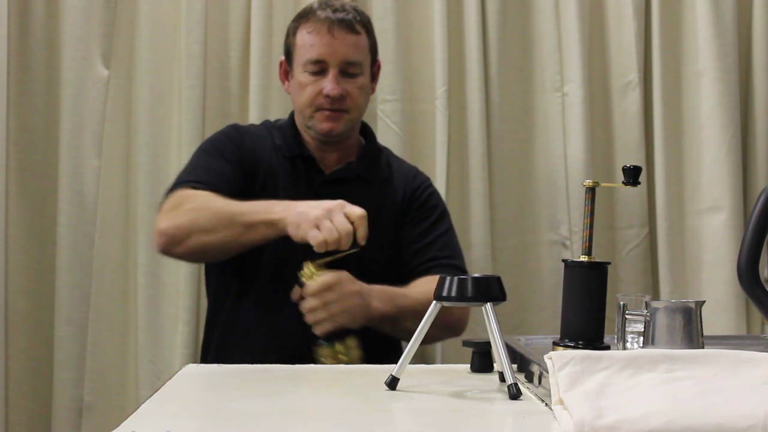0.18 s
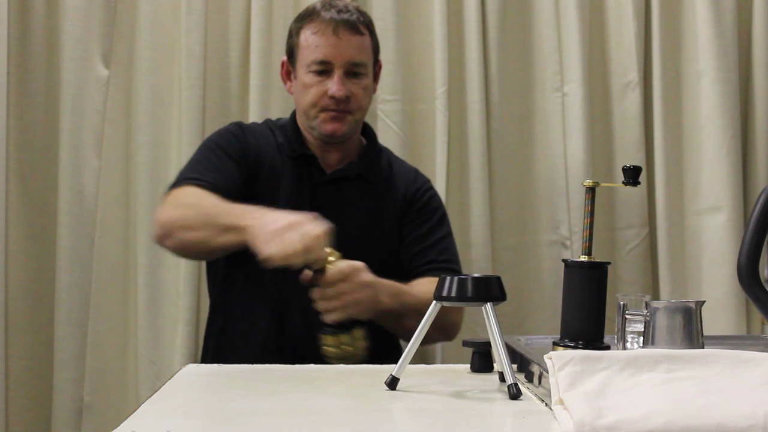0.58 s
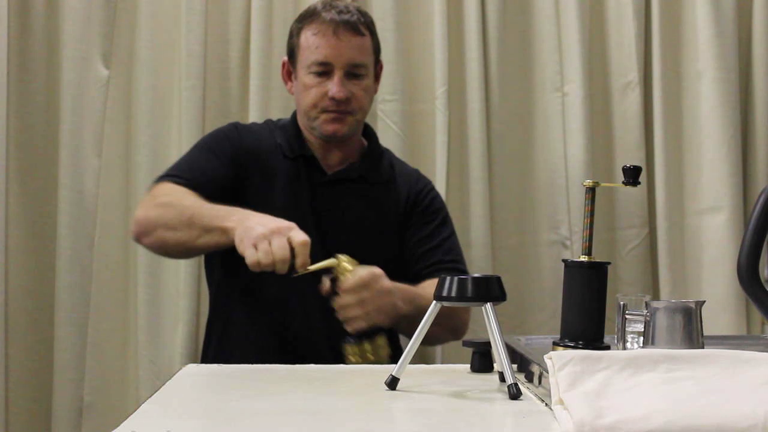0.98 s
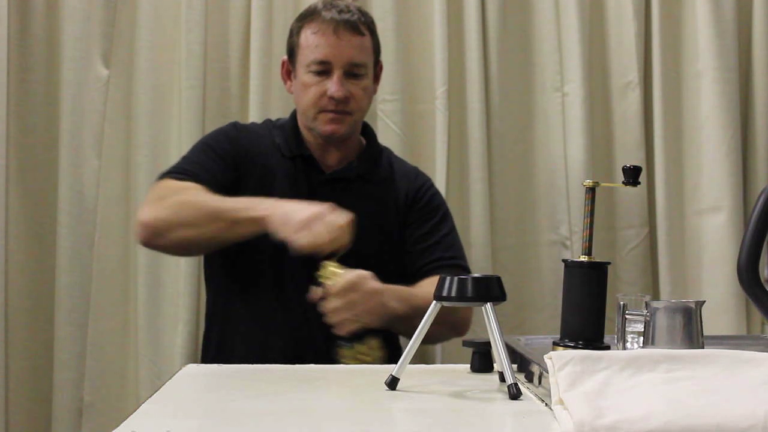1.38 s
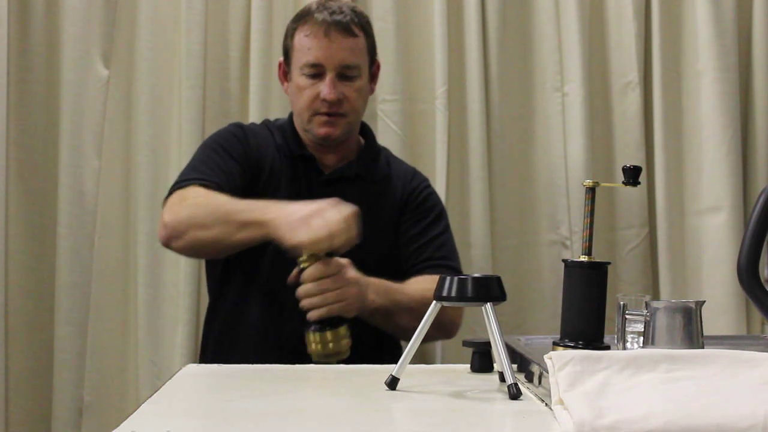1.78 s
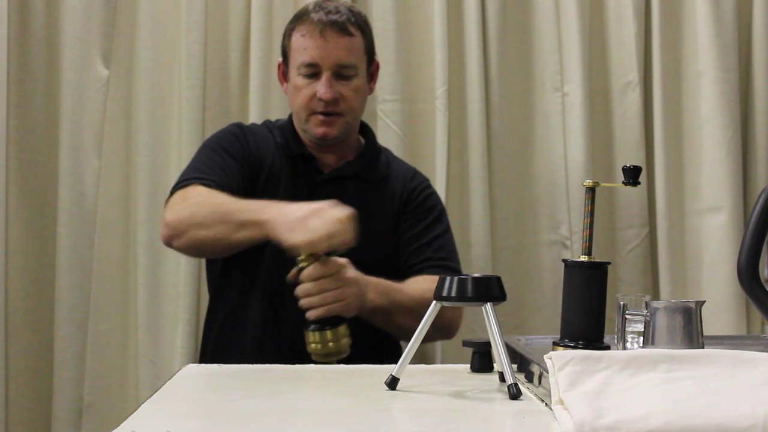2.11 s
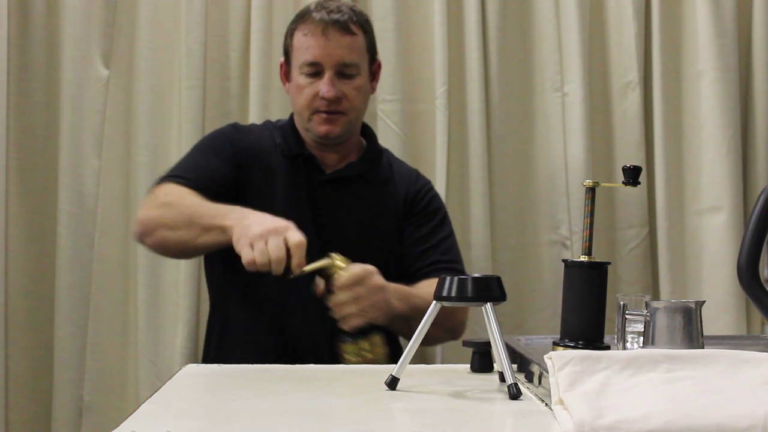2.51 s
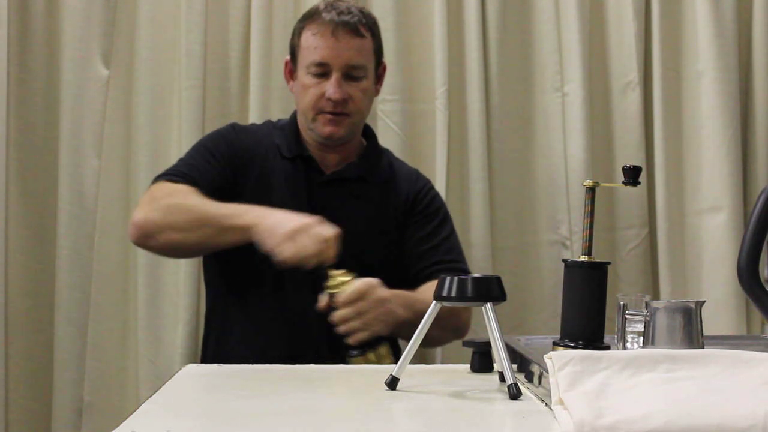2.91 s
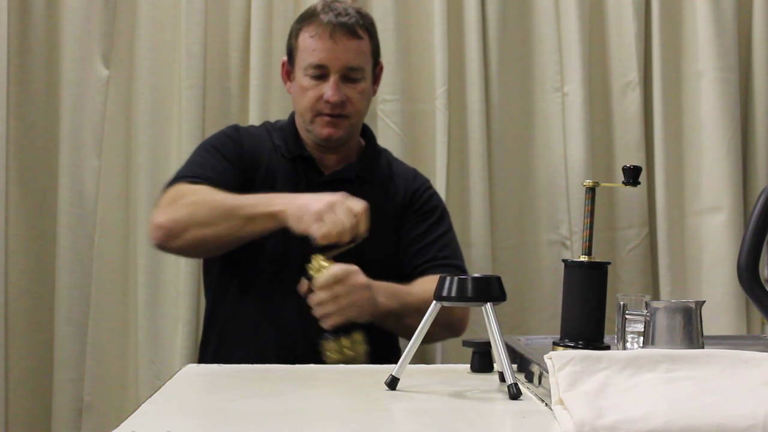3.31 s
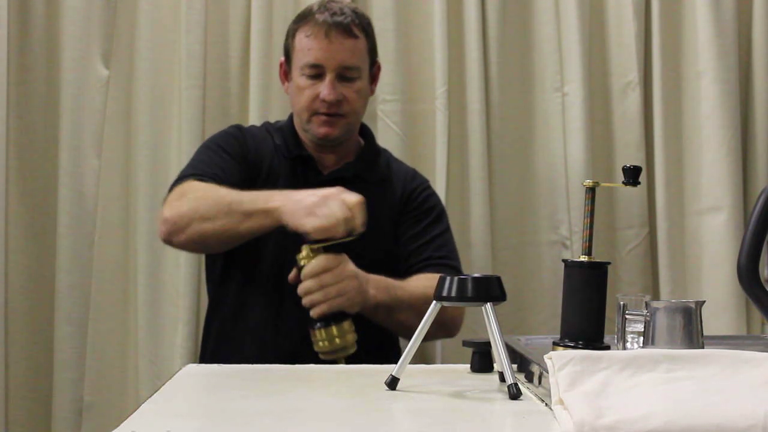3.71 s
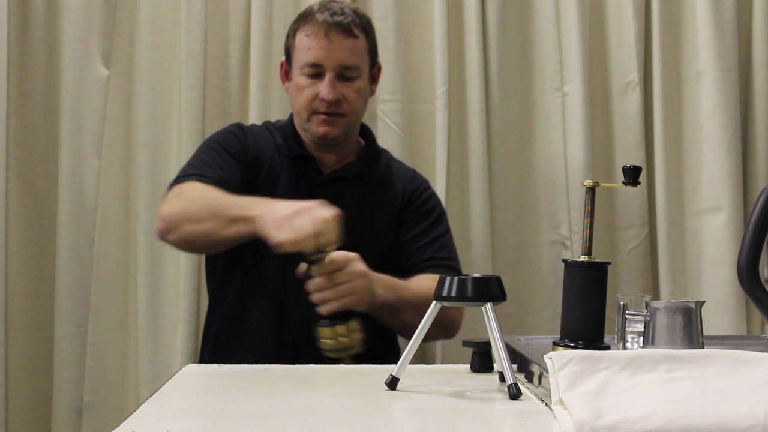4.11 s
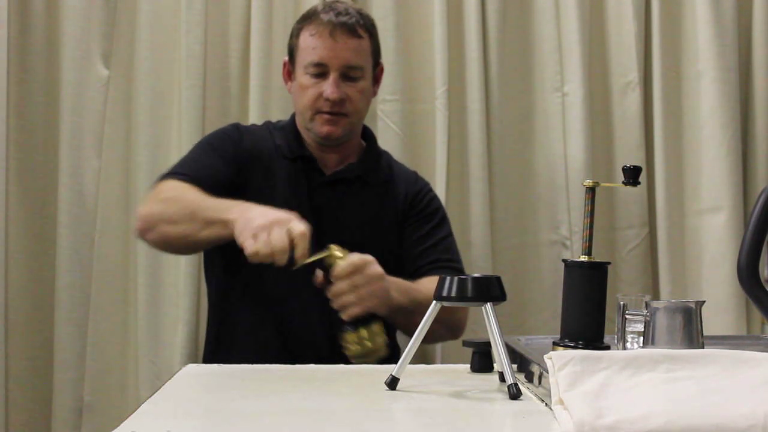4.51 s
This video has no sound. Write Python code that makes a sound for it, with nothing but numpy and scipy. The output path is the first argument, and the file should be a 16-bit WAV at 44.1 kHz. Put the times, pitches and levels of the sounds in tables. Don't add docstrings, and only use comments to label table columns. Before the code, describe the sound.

Steady, rough grinding of coffee beans in a brass hand mill, already running at the start and still going at the end. Each turn gives a slight hollow surge; the grit thickens and thins unevenly, peppered with snaps, hollow metallic taps and short stick-slip chirps. Heard from a couple of metres on a camera microphone, fairly dry, highest treble cut off, faint low room hum behind.

```python
import sys
import numpy as np
from scipy import signal
from scipy.fft import rfft, irfft
from scipy.io import wavfile
from scipy.ndimage import uniform_filter1d

SR = 44100
rng = np.random.default_rng(int(sys.argv[2]) if len(sys.argv) > 2 else 0)


def int16_out(signal):
    q = np.round(np.clip(np.atleast_2d(signal).T, -1, 1) * 32767)
    wavfile.write(sys.argv[1], SR, q.astype(np.int16))


def ratio_of_db(decibels):
    return 10 ** (np.asarray(decibels, float) / 20)


N = 206737
FREQ = np.fft.rfftfreq(N, 1 / SR)
BURST = 400
LARGEST = 2.9

# start_s, peak_db, tube_db (re peak), cutter_db (re peak)
BEAN_CRACKS = [(0.0957, -25, -7, -11), (0.1456, -17, -7, -10), (0.1654, -20, -11, -15),
               (0.2004, -21, -14, -19), (0.5916, -25, 2, -7), (0.8265, -20.5, -6, -10),
               (0.9956, -30, -18, -18), (1.1922, -18.5, -9, -13), (1.3074, -25.5, -8, -6),
               (1.3693, -16, -7, -23), (1.6701, -19, -11, -13), (1.6874, -19, -10, -15),
               (1.8906, -21.5, -4, -12), (1.9724, -22, -3, -14), (2.176, -15.5, -20, -23),
               (2.2149, -21, -13, -17), (2.4014, -23, -10, -14), (2.6783, -21, -7, -14),
               (2.7014, -22, -13, -16), (2.7267, -18.5, -18, -18), (3.052, -22, -13, -19),
               (3.4271, -19, -9, -9), (3.9584, -22, -11, -8), (4.3011, -22.5, 1, -11),
               (4.3595, -23, -5, -18), (4.4204, -18.5, -6, -20), (4.4638, -20.5, -13, -11),
               (4.5486, -21.5, -10, -8), (4.587, -20, -15, -13), (4.6124, -23, -5, -13)]
ZONE_BORDERS_HZ = [300, 1050, 1420, 2500, 5400, 13000]
ZONE_REST_DB = [-46, -42.5, -39.5, -42, -42]


def level(x, db):
    return x * ratio_of_db(db) / np.sqrt(np.mean(x ** 2))


def curve(table):
    s, *columns = np.transpose(table)
    return [np.interp(np.arange(N) / SR, s, c) for c in columns]


def colour(table):
    hz, db = np.transpose(table)
    return ratio_of_db(np.interp(np.log(FREQ + 1), np.log(hz), db))


def causal(gain):
    cepstrum = irfft(np.log(gain + 1e-7), N)
    cepstrum[1:N // 2] *= 2
    cepstrum[N // 2 + 1:] = 0
    return np.exp(rfft(cepstrum))


def ring(x, hz, width_hz):
    return signal.lfilter(*signal.iirpeak(hz, hz / width_hz, fs=SR), x)


def walk(rate):
    hold = int(SR / rate)
    steps = rng.standard_normal(N // BURST)[:N // hold + 1]
    slewed = uniform_filter1d(np.repeat(steps, hold), hold)
    return 1.855 * uniform_filter1d(slewed, hold)[:N]


def swell(at_s, length_s, release=1):
    t = np.arange(N) / SR - at_s
    return np.exp(-(t / (length_s * np.where(t > 0, release, 1))) ** 2)


def mill():
    # centre_hz, width_hz, level_db (over the broad colour)
    brass_modes = [(540, 160, -10.5), (710, 27, -9), (860, 17, -11), (1034, 26, -9.5), (1190, 43, -2.5),
                   (1256, 70, -2.5), (1350, 110, -11), (1520, 39, -10), (1628, 27, -6), (1760, 35, -7),
                   (1910, 79, -17.5), (2150, 48, -28), (3290, 71, -6), (3450, 85, -11.5), (4030, 48, -14),
                   (4670, 35, -29), (4860, 110, -5.5), (5330, 120, -6), (7450, 56, 1), (7790, 250, -2)]
    effort_db = effort()
    _, peak_db, tube_db, cutter_db = np.transpose(BEAN_CRACKS)
    tube_db = peak_db + tube_db
    crack_db = [tube_db + 6.0, tube_db + 9.5, tube_db + 5, peak_db + 9.5, peak_db + cutter_db + 18]
    decay_s = [.002, .0015, .001, .0007, .0007]
    splinters = rng.standard_normal((len(BEAN_CRACKS), BURST))
    beans = fractures(2500., 2.3) * ratio_of_db(1.7 * walk(40.))
    out = 0
    for k, grit_db in enumerate([7.0, 8.0, 3.0, 2.5, 0.5]):
        grit = ratio_of_db(grit_db + 0.33 * walk(18.)) * fractures(9000., 1.87)
        drive = level(beans + grit, 0) * ratio_of_db(effort_db[k])
        drive = drive + cracks(splinters, crack_db[k], decay_s[k])
        low, high = ZONE_BORDERS_HZ[k:k + 2]
        body = drive
        for hz, width_hz, db in brass_modes:
            if low <= hz < high:
                body = body + ratio_of_db(db + 1.0 * walk(11.)) * ring(drive, hz, width_hz)
        body = irfft(rfft(body) * causal(zone(k)), N)
        out = out + body * np.std(drive) / np.std(body)
    return out


def effort():
    # at_s, push_db
    turns = [(.03, 4.5), (.31, 7.5), (.62, 5), (.93, 5), (1.23, 6.5), (1.55, 1.5), (1.87, 0.5), (2.19, 1.5),
             (2.47, 4.5), (2.78, 4.5), (3.11, 4.5), (3.46, 2), (3.8, 6.5), (4.13, 3), (4.49, 6.5),
             (4.64, 2.5)]
    # at_s, length_s, burrs_db, tube_wall_db
    bites = [(0.077, 0.023, -2, -3), (0.146, 0.085, 2, 3), (0.32, 0.11, 2.5, 0.5), (.59, 0.086, 2, -1),
             (0.678, 0.021, -5.5, 2), (0.824, 0.11, 3.5, 2), (1.217, 0.037, 4.5, 2.5), (1.3, .03, 0, -2),
             (1.396, 0.04, 1.5, 0), (1.613, .04, -3.5, -3), (1.704, 0.051, 3.5, 2), (1.894, 0.027, 0, -0.5),
             (2.166, 0.029, 1.5, 2), (2.443, 0.054, 1.5, -3.5), (2.615, 0.022, 0, 4),
             (2.714, 0.059, 2.5, 0.5), (2.89, 0.038, -4, -1), (3.122, 0.044, 3.5, -2),
             (3.428, 0.068, 4.5, 2.5), (3.514, 0.027, -2, -1), (3.595, 0.032, 3, 3),
             (3.78, 0.049, 1.5, -2.5), (3.897, 0.026, -2, -1), (4.1, 0.052, 1.5, -2),
             (4.208, 0.043, -3, -5), (4.442, 0.055, 3, 1.5), (4.66, 0.14, 2, 3.5)]
    # at_s, level_db
    powder_flow = [(0.0, -61), (0.01, -44), (0.34, -42.5), (0.39, -44.5), (1.17, -47.5), (1.2, -41),
                   (1.47, -45.5), (1.49, -40.5), (1.63, -52.5), (1.71, -41), (2.06, -49), (2.49, -41.5),
                   (3.08, -49.5), (3.11, -43.5), (3.28, -48.5), (4.41, -43.5), (4.48, -49.5), (4.69, -46.5)]
    push_s, return_s = 0.05, .13
    push = 0
    for s, db in turns:
        push = push + db * (swell(s, push_s) + 0.28 * swell(s + return_s, push_s))
    burrs, wall = sum(np.outer(db, swell(s, length, 1.02)) for s, length, *db in bites)
    flow = curve(powder_flow)[0]
    push_to_burrs = 0.088
    moves = [flow - flow.mean() + 0.19 * push,
             push + 0.11 * burrs,
             wall,
             burrs + push_to_burrs * push,
             0.85 * burrs + push_to_burrs * push]
    return [rest_db + move for rest_db, move in zip(ZONE_REST_DB, moves)]


def fractures(rate, spread_db):
    strikes = rng.random(N) < rate / SR
    sizes = ratio_of_db(spread_db * np.minimum(rng.exponential(size=N), LARGEST))
    return level(strikes * rng.standard_normal(N) * sizes, 0)


def cracks(splinters, db, decay_s):
    out = np.zeros(N + BURST)
    t = np.arange(BURST) / SR
    shape = (1 - np.exp(-t / .0006)) * np.exp(-t / decay_s)
    for row, burst, size in zip(BEAN_CRACKS, splinters * shape, ratio_of_db(db)):
        at = int(row[0] * SR)
        out[at:at + BURST] += size * burst / np.sqrt(np.sum(burst ** 2))
    return out[:N]


def zone(k, order=10):
    # freq_hz, level_db (per Hz)
    mill_colour = [(210, -44.5), (350, -17.5), (450, -16.5), (562, -10.5), (614, -13.5), (877, -8),
                   (958, -9.5), (1230, -2), (2430, -9), (3970, -10), (4810, -8.5), (5750, -19), (7730, -16),
                   (10400, -19.5), (12000, -38), (15700, -66), (22000, -120)]
    low, high = ZONE_BORDERS_HZ[k:k + 2]
    slopes = (1 + (low / (FREQ + 1)) ** order) * (1 + (FREQ / high) ** order)
    return colour(mill_colour) / np.sqrt(slopes)


def squeaks():
    # middle_s, length_s, pitch_hz, level_db
    caught_beans = [(0.025, 0.063, 1295, -40), (0.136, 0.06, 3370, -46), (0.17, 0.069, 1510, -39.5),
                    (0.174, 0.17, 4690, -44), (0.18, 0.1, 6530, -48), (0.753, 0.093, 3450, -43.5),
                    (0.924, 0.14, 4530, -51), (0.99, 0.13, 1800, -50), (0.743, 0.06, 1220, -43),
                    (1.094, 0.08, 3320, -48), (1.2, 0.072, 7410, -46), (1.22, 0.052, 860, -44),
                    (1.296, 0.04, 1583, -35.5), (1.427, 0.06, 3330, -44), (1.456, 0.15, 4740, -45.5),
                    (1.734, 0.13, 4100, -47.5), (1.993, 0.12, 520, -51), (1.9, 0.23, 1490, -43),
                    (1.984, 0.13, 4150, -49), (2.1, 0.1, 1770, -41.5), (2.193, 0.13, 1360, -37.5),
                    (2.31, 0.055, 3280, -43.5), (2.75, 0.13, 1826, -41), (2.9, 0.2, 1520, -45),
                    (3.09, 0.13, 4760, -49), (3.479, 0.18, 1270, -42.5), (3.966, 0.082, 3450, -46),
                    (4.077, 0.05, 1050, -41), (3.32, 0.1, 4900, -49), (0.276, 0.25, 700, -47)]
    t, slips, out = np.arange(N) / SR, fractures(4000., 1.3), np.zeros(N)
    for middle, length, hz, db in caught_beans:
        caught = np.abs(t - middle) < length
        sung = ring(ring(slips[caught], hz, 70 + .03 * hz), hz, 120 + .04 * hz)
        bell = np.exp(-((t[caught] - middle) / (0.61 * length)) ** 2)
        out[caught] += level(sung, db + .5) * bell
    return out


def knocks():
    # start_s, peak_db, pitch_hz
    wall_hits = [(0.0467, -22, 1290), (0.141, -18, 1480), (0.318, -25, 1280), (0.453, -19.5, 1580),
                 (0.9951, -17, 1740), (1.038, -21.5, 1174), (1.088, -23, 1360), (1.2678, -24, 1280),
                 (1.3097, -17, 1540), (1.367, -19, 1480), (1.706, -22, 1550), (1.8891, -19, 1600),
                 (2.154, -22, 1280), (2.176, -20, 1190), (2.2147, -17.5, 1350), (2.3954, -28, 1180),
                 (2.4268, -24, 1260), (2.453, -20.5, 1210), (2.4912, -22, 1350), (2.5977, -24, 1460),
                 (2.681, -19, 1650), (2.9594, -20, 1350), (3.1323, -17.5, 1300), (3.4438, -19, 1250),
                 (4.1077, -17.5, 1260), (4.1694, -20, 1235), (4.357, -27, 1500), (4.504, -25, 1246),
                 (4.5478, -24, 1280), (4.614, -17.5, 1270)]
    t, out = np.arange(2 * BURST) / SR, np.zeros(N + 2 * BURST)
    shape = (t / 0.0031) * np.exp(1 - t / 0.0021)
    for (start, db, hz), phase in zip(wall_hits, rng.random((len(wall_hits), 1))):
        at = int(start * SR)
        out[at:at + 2 * BURST] += ratio_of_db(db - 6.0) * shape * np.sin(2 * np.pi * (hz * t + phase))
    return out[:N]


def glides():
    # start_s, end_s, from_hz, to_hz, level_db
    squeezed_beans = [
        (2.58, 2.66, 1407, 1800, -43),
        (2.67, 2.729, 1600, 2100, -38),
    ]
    t, out, rough = np.arange(N) / SR, np.zeros(N), walk(105.)
    for start, end, from_hz, to_hz, db in squeezed_beans:
        along = np.clip((t - start) / (end - start), 0, 1)
        phase = 2 * np.pi * np.cumsum(from_hz + (to_hz - from_hz) * along ** 0.91) / SR
        out += ratio_of_db(db + 0.5) * np.sin(np.pi * along) * rough * np.sin(phase)
    return out


def chips():
    rate_per_s, low_hz, high_hz, cycles = 260, 2004, 9540, 5.1
    when, pitch, size = rng.random((1500, 3)).T
    t, out = np.arange(BURST // 2) / SR, np.zeros(N + BURST)
    hz = (low_hz * (high_hz / low_hz) ** pitch)[:, None]
    fall = t * hz / cycles
    heard = np.arange(len(when)) < rate_per_s * N / SR
    gain = heard * ratio_of_db(3.0 * np.minimum(-np.log(size), LARGEST))
    snaps = gain[:, None] * np.sqrt(hz * fall) * np.exp(-3 * fall) * np.sin(2 * np.pi * hz * t)
    np.add.at(out, (when * N).astype(int)[:, None] + np.arange(len(t)), snaps)
    shell_bite_db = effort()[3] - ZONE_REST_DB[3]
    return level(out[:N], -46.5) * ratio_of_db(shell_bite_db)


def room(x):
    t60_s, wet_db = 0.28, -11
    t = np.arange(SR // 2) / SR
    decay = np.exp(-np.log(1000) * t / t60_s) * (t > .004)
    tails = rng.standard_normal((4, len(t))) * decay
    tails = signal.lfilter([1], [1, -.15], tails)
    shares = np.array([walk(5.) for _ in tails])
    shares /= np.sqrt(np.sum(shares ** 2, axis=0))
    wet = sum(signal.fftconvolve(x * share, tail)[:N] for share, tail in zip(shares, tails))
    return x + ratio_of_db(wet_db) * wet * np.std(x) / np.std(wet)


def fan():
    # freq_hz, level_db (per Hz)
    rumble_colour = [(12, -31), (20, -5.5), (48, -8), (91, -5.5), (140, -8), (188, -6.5), (420, -9),
                     (550, -18), (920, -120)]
    # start_s, end_s
    spells = [
        (-.1, .07),
        (2.02, 3.52),
        (4.0, 5.1),
    ]
    hum_hz, waver_hz, low_db, high_db, ramp_s = 93.7, 1.17, -67, -60, .04
    beat_hz, beat_db, beat_peak_s = 5.7, 2.0, 3.07
    noise = rng.standard_normal((2, N))
    phase = 2 * np.pi * np.cumsum(hum_hz + waver_hz * walk(6.)) / SR
    t = np.arange(N) / SR
    up = sum(np.clip(np.minimum(t - start, end - t) / ramp_s + .5, 0, 1) for start, end in spells)
    beat = beat_db * np.cos(2 * np.pi * beat_hz * (t - beat_peak_s))
    drone_db = low_db + (high_db - low_db) * up + beat + 1.3 * walk(18.0)
    drone = np.sqrt(2) * np.sin(phase) * ratio_of_db(drone_db)
    overtone = level(ring(noise[0], 199.2, 3.9), -71)
    rumble = level(irfft(rfft(noise[1]) * colour(rumble_colour), N), -55.5)
    return drone + overtone + rumble


def scene():
    grinding = mill() + squeaks() + knocks() + glides() + chips()
    return (room(grinding) * ratio_of_db(0.3) + fan())[None]


def roll_off(x):
    return signal.sosfilt(signal.butter(12, 12200, fs=SR, output="sos"), x)


def record(dry):
    spectrum = rfft(dry) / np.sqrt(1 + (FREQ / 12000) ** 60)
    edge = FREQ > 11800
    kept = uniform_filter1d(1. * (walk(45.) > .2), BURST)
    heard = irfft(spectrum * ~edge, N) + kept * irfft(spectrum * edge, N)
    return roll_off(heard + .0015)


dry = scene()
out = record(dry)
int16_out(out)
```